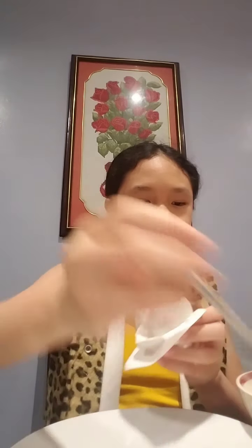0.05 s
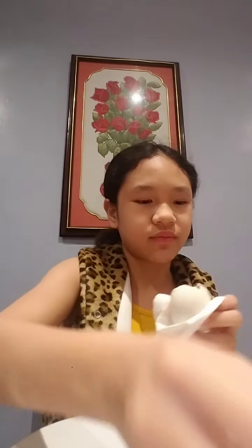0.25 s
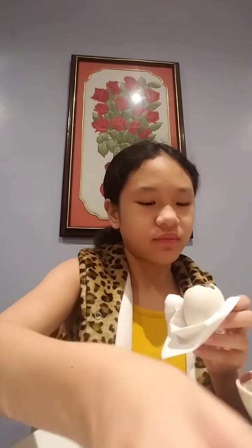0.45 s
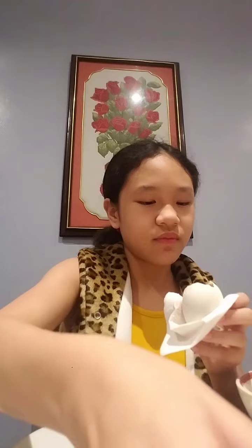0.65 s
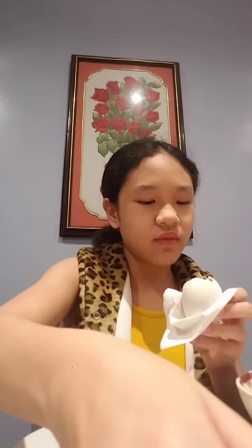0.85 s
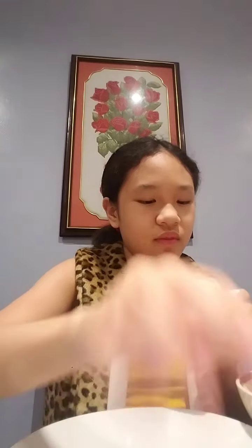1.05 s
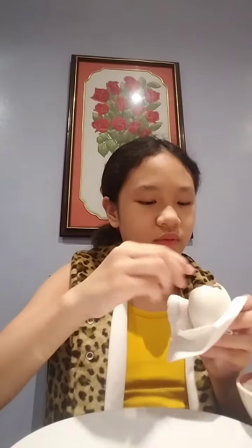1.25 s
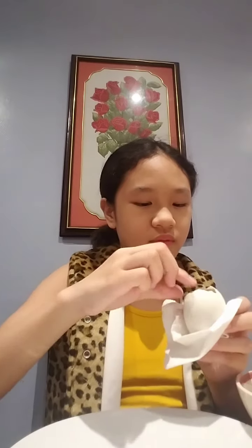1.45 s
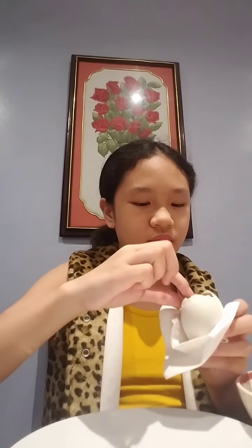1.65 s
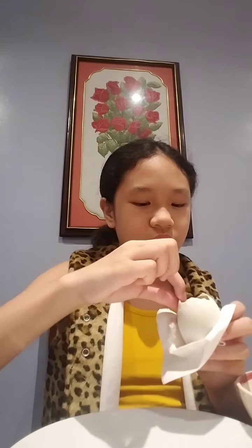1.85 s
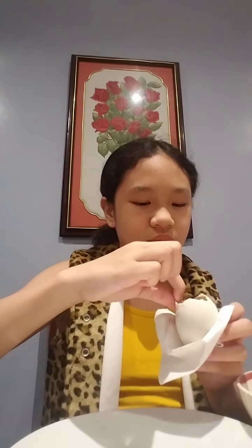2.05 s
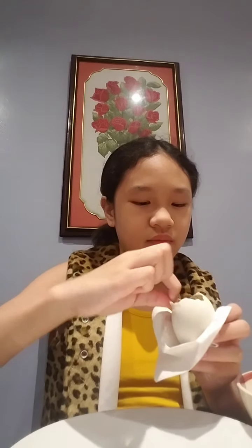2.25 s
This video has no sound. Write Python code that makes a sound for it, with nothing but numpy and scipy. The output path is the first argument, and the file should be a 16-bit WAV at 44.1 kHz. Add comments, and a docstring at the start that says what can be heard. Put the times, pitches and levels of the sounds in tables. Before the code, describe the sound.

Close by in a small, faintly humming room, a metal utensil lands on a table with bright ringing clinks and a brief chatter. After a pause, an eggshell crackles faintly under fingers while a paper napkin rustles softly.

```python
"""In a small, faintly humming room, a steel utensil is put down on a table close to the microphone.
One end clinks, then the other drops, chatters and settles: each touch makes the steel ring, and the
heavier ones make the table knock. Fingers then pick at an eggshell, which snaps in tiny dry cracks,
while hands bump softly and a paper napkin rustles."""
import sys
import numpy as np
from scipy import signal
from scipy.fft import rfft, irfft
from scipy.io import wavfile

SR = 44100
rng = np.random.default_rng(int(sys.argv[2]) if len(sys.argv) > 2 else 0)


def master_out(mix):
    """Clip the mix to full scale and print it as 16-bit PCM to the path in sys.argv[1]."""
    frames = np.transpose(np.atleast_2d(mix))
    ceiling = np.clip(frames, -1, 1)
    pcm = np.round(ceiling * 32767).astype(np.int16)
    wavfile.write(sys.argv[1], SR, pcm)


N = 105840
TIME, FREQS = np.arange(N) / SR, np.arange(N // 2 + 1) * SR / N

# tone colour of the room's air and of the napkin: f/Hz, relative level/dB
AIR_COLOUR = [(25, -9), (55, -0.5), (145, -7), (245, -6.5), (300, -11), (480, -16.5), (750, -18.5),
              (1200, -25.5), (2400, -27.5), (4600, -35.5), (8500, -39.5), (14800, -31.5), (16000, -41)]
NAPKIN_COLOUR = [(50, -7), (130, 1.5), (320, 0.5), (700, -10), (1500, -12.5), (5500, -18), (9000, -23.5)]
# how alike left and right are, for room and table sounds: f/Hz, likeness (1 = the same)
AIR_LIKENESS = [(60, 0.97), (300, .85), (1000, 0.14), (3000, 0.05), (15000, 0.031)]
TABLE_LIKENESS = [(100, 0.63), (500, 1), (2200, .8), (4500, 0.21), (15000, 0.72)]
# mains hum: f/Hz, level/dB
HUM = [(120, -79), (240, -72.5), (479, -78)]
# how a far tone, the napkin and the shell crumbs swell and fade: t/s, level/dB
TONE_LEVEL = [(1.58, -96), (1.61, -71), (1.66, -83.5), (1.71, -70), (1.77, -80.5), (2.0, -87)]
NAPKIN_LEVEL = [(1.59, -86.5), (1.635, -59.5), (1.75, -67), (2.28, -67.5), (2.305, -50.5), (2.365, -57.5),
                (2.4, -63)]
CRUMB_LEVEL = [(1.57, -87), (1.61, -48.5), (1.72, -85), (1.8, -57), (1.92, -53.5), (2.06, -74), (2.2, -48),
               (2.4, -63)]
# soft bumps and rubs of the hands: t/s, level/dB, strongest f/Hz
BUMPS = [(1.079, -64.5, 2564), (1.134, -71, 3990), (1.202, -58.5, 1306), (1.555, -56.5, 909),
         (1.636, -58.5, 750), (1.69, -61, 752)]
# cracks in the shell: t/s, level/dB, extra for low notes/dB, extra for high notes/dB
CRACKS = [(0.752, -76, -15, 18), (.765, -70, -17, 23), (1.607, -47, -7, 16), (1.6332, -42, -21, 6),
          (1.6986, -51.5, 1, -1), (1.7582, -47, -10, 5), (1.7876, -44.5, -15, 16),
          (1.792, -26.5, -0.5, 6.5), (1.799, -47, -2, 18.5), (1.8065, -49, 14, -3), (1.851, -39, -10, 17),
          (1.882, -44.5, 1, -2), (1.9015, -47, -6, 4), (1.9493, -40.5, 6.5, 3), (1.966, -40.5, -6, 0),
          (2.0277, -43.5, -0.5, 4.5), (2.0617, -48.5, -5, 8), (2.0951, -49.5, 8, 10), (2.185, -43, -8, 6),
          (2.1997, -31, -3, -8), (2.2154, -35, 6.5, -1), (2.2948, -30, 1.5, 0), (2.308, -40.5, 3.5, -11),
          (2.351, -48, -3, 20), (2.358, -46, -1, 3), (2.397, -28.5, 1, 0)]
# the shell's modes (notes it rings at): f/Hz, level/dB, t60/s (time to fade by 60 dB)
SHELL_MODES = [(2270, -12.5, 0.0037), (2980, -7.5, .005), (4340, -3.5, 0.0033), (5210, -3, .0025),
               (6250, -1.5, .0035), (8300, -16.5, .0015), (9900, -14, 0.0016), (11900, -15.5, .0015),
               (14799, -14.5, .0025)]
# knocks on the table top: t/s, knock level/dB, boom level/dB
KNOCKS = [(0.202, -18.5, -29.5), (.215, -24.5, -41.5), (0.253, -29, -40), (.456, -42, -33),
          (0.4651, -33.5, -26), (0.473, -34.5, -36.5), (0.5685, -43.5, -43), (0.584, -49, -40.5)]
# tone colour of a knock: f/Hz, relative level/dB
KNOCK_COLOUR = [(40, -22.5), (85, -10.5), (125, 6), (190, 6.5), (260, 4), (350, 9), (450, -29), (1500, -44)]
# which side table sounds lean to: f/Hz, left minus right/dB
TABLE_PAN = [(60, 1), (200, -6), (700, -7), (2400, -3), (4400, -8), (7800, 0), (9600, -17.5), (11500, -4.5),
             (15000, -3.5)]
# the first end lands, the other drops, the utensil settles: t/s, level/dB, treble tilt/(dB per octave)
FIRST_TOUCHES = [(.2004, -6, 2), (.2022, 0, 3.5), (.2128, -1.5, -7), (.2158, 4.5, -0.5), (.2235, -1, 4.5),
                 (.2355, -4.5, 2), (.247, -10.5, 2), (.2605, -17, -5.5)]
DROP_TOUCHES = [(.4555, -3.5, -6), (.461, 2, 3.5), (.464, 9, 1), (.472, 2.5, 5.5), (.476, 0.5, 0),
                (.4825, 0.5, 5.5), (.4875, -11, -9), (.5025, -18, 1.5)]
SETTLE_TOUCHES = [(.5672, 8, -3), (.572, 5, 5), (.583, 6.5, -1), (.599, 0, -4.5), (.6065, -4, -6),
                  (.614, -16.5, -5), (.629, -26, -9)]
# the steel's modes in those three stages: f/Hz, level/dB, t60/s
FIRST_MODES = [(2331, -35, .26), (3115, -32, .2), (3135, -34, .23), (3290, -39, .22), (3376, -38, .2),
               (4190, -23.5, .18), (5157, -32, .22), (5212, -37, .33), (5406, -32, .16), (5480, -35, .17),
               (6212, -38, .23), (6810, -34.5, .2), (7518, -39, .21), (8037, -44, .24), (9577, -25, .19),
               (9837, -35, .17), (9922, -34, .16), (11594, -41, .15), (11800, -41, .28), (11985, -43, .34),
               (12510, -49, .38), (12830, -48, .2), (13410, -42, .17), (15149, -39, .16), (15380, -36, .1)]
DROP_MODES = [(2004, -32.5, .13), (3142, -38, .18), (4190, -38, .13), (4393, -36, .12), (4510, -34, .12),
              (6700, -35, .06), (7745, -36, .11), (7797, -36, .12), (9792, -49, .16), (11789, -46, .14),
              (12010, -49, .2), (13370, -52, .14)]
SETTLE_MODES = [(1653, -50, .16), (2005, -51, .27), (2095, -44, .16), (2983, -50, .13), (4096, -50, .13),
                (4510, -50, .2), (4703, -47, .13), (4775, -50, .11), (7970, -53, .15), (12010, -68, .25)]
# tone colour of the clatter, the dense ring of utensil and table together: f/Hz, relative level/dB
FIRST_CLATTER = [(450, -20.5), (800, -9), (1150, -15.5), (1550, -3), (2400, 5), (2950, -13), (3250, -2.5),
                 (3750, -10.5), (4300, -0.5), (4750, -5.5), (5400, 9.5), (5900, -5.5), (6800, 1),
                 (7500, -14.5), (8100, -4.5), (8700, -13.5), (9700, -4), (10600, -19), (11300, -4),
                 (12400, -17.5), (13300, -9.5), (14100, -23.5), (15200, -5.5), (16000, -32.5)]
DROP_CLATTER = [(450, -4), (1000, -4), (1600, 1.5), (2000, 15), (2600, 2), (3200, 3.5), (3700, -4),
                (4450, 12), (5300, -3.5), (6100, -7.5), (6650, 1.5), (7300, -14), (7850, 8), (8800, -7),
                (9700, -5), (10400, -18), (11800, -4.5), (12900, -21.5), (15100, -10), (16000, -36)]
SETTLE_CLATTER = [(450, 2), (800, -34), (1550, 8.5), (2100, 9), (2400, -4), (3000, 9.5), (3700, -14.5),
                  (4200, 4), (4800, 11.5), (6300, -18), (8000, 0.5), (10600, -18), (12000, -17),
                  (16000, -22)]
# how long the clatter takes to fade: f/Hz, t60/s
FIRST_T60 = [(500, 0.23), (2500, 0.15), (15000, .12)]
DROP_T60 = [(500, 0.041), (2500, 0.1), (15000, 0.054)]
SETTLE_T60 = [(500, 0.08), (2500, 0.06), (15000, 0.045)]


def from_db(db):
    """Turn decibels into a factor to multiply by."""
    return 10 ** (np.asarray(db) / 20)


def at_hz(points, hz):
    """Read between the rows of a table, on a scale of octaves."""
    f, value = np.transpose(points)
    return np.interp(np.log(np.maximum(hz, 1)), np.log(f), value)


def level(points):
    """Gain over time from rows of t/s, level/dB."""
    return from_db(np.interp(TIME, *np.transpose(points)))


def panned(db):
    """Left and right gains, with the left louder by db."""
    return from_db(db * np.array([[.5], [-.5]]))


def clicks(times, sizes):
    """One-sample clicks of the given sizes at the given times."""
    return np.bincount((np.abs(times) * SR).astype(int), sizes, N)[:N]


def fading(times, db, t60):
    """Strength of a vibration that gains energy at each touch and loses it steadily."""
    energy_kept = from_db(-60 / (t60 * SR)) ** 2
    return np.sqrt(signal.lfilter([1], [1, -energy_kept], clicks(times, from_db(db) ** 2) + 1e-18))


def eased(envelope, rise_s=.0003):
    """Give each touch a brief moment to build up."""
    kept = np.exp(-1 / (rise_s * SR))
    return signal.lfilter([1 - kept], [1, -kept], envelope)


def noise(colour, likeness):
    """Stereo noise of a given tone colour and left-right likeness, with average power 1."""
    mid, side = rfft(rng.standard_normal((2, N)))
    alike = np.clip(at_hz(likeness, FREQS), -1, 1)
    stereo = np.sqrt(1 + alike) * mid + np.sqrt(1 - alike) * side * [[1], [-1]]
    x = irfft(from_db(at_hz(colour, FREQS)) * stereo, N)
    return x / x.std()


def background(air_db=-59.5, tone_hz=1340):
    """Room air, mains hum and a faint far tone that comes and goes."""
    sine = lambda hz: np.sqrt(2) * np.sin(2 * np.pi * (hz * TIME + rng.random()))
    hum = sum(from_db(db) * sine(hz) for hz, db in HUM)
    return from_db(air_db) * noise(AIR_COLOUR, AIR_LIKENESS) + hum + level(TONE_LEVEL) * sine(tone_hz)


def napkin_and_hands():
    """The napkin rustles in swells of noise; each bump of the hands is a short, soft puff."""
    out = level(NAPKIN_LEVEL) * noise(NAPKIN_COLOUR, AIR_LIKENESS)
    for start, db, hz in BUMPS:
        rub = noise([(hz / 4, -35), (hz, 0), (hz * 3, -35)], AIR_LIKENESS)
        out += fading(np.array([start]), [db], t60=.108) * rub
    return out


def room_echo(x, t60=.22, delay_s=.008):
    """Sound bounces around the room and returns as a blur, different left and right."""
    t = TIME[:SR // 2]
    echoes = rng.standard_normal((2, len(t))) * from_db(-60 * t / t60) * (t > delay_s)
    echoes /= np.sqrt(np.sum(echoes ** 2) / 2)
    return signal.fftconvolve(x[None], echoes, axes=1)[:, :N]


def eggshell(crumbs_per_s=120, scatter_db=1.5):
    """Cracks and crumbs make the shell ring for a few milliseconds, straight ahead."""
    times, db, low_db, high_db = np.transpose(CRACKS)
    crumbs = (rng.random(N) < crumbs_per_s / SR) * rng.choice([-1, 1], N) * level(CRUMB_LEVEL)
    scatter = scatter_db * rng.standard_normal((len(times), len(SHELL_MODES)))
    splinters = from_db(-15) * rng.standard_normal(N)   # tiny fractures that follow each snap
    out = np.zeros(N)
    for k, (hz, mode_db, t60) in enumerate(SHELL_MODES):
        snap_db = db + scatter[:, k] + low_db * (hz < 3600) + high_db * (hz > 7000)
        snaps = clicks(times, from_db(snap_db)) + fading(times, snap_db, t60=.0074) * splinters + crumbs
        kept, turn = from_db(-60 / (t60 * SR)), 2 * np.pi * hz / SR   # fade and angle per sample
        ring = signal.lfilter([.5, 0, -.5], [1, -2 * kept * np.cos(turn), kept * kept], snaps + 1e-18)
        out += (-1) ** k * from_db(mode_db) * ring
    return out + from_db(-10) * room_echo(out)


def from_table(hz, lag_s=.000286):
    """Place a sound on the table: it reaches the left side later and mostly weaker."""
    gains = panned(at_hz(TABLE_PAN, hz))
    delay = np.exp(-2j * np.pi * hz * lag_s * np.array([[1], [0]]))
    return gains / np.sqrt(np.mean(gains ** 2, axis=0)) * delay


def table_top(boom_hz=193.5, low_cut_hz=96):
    """The table answers the heavier touches with a dull knock and a short boom of its main mode."""
    times, knock_db, boom_db = np.transpose(KNOCKS)
    envelope = np.hypot(fading(times, knock_db, t60=.054), fading(times, knock_db - 19.5, t60=.46))
    knock = envelope * irfft(rfft(noise(KNOCK_COLOUR, TABLE_LIKENESS)) * from_table(FREQS), N)
    wave = from_table(boom_hz) * np.exp(2j * np.pi * (boom_hz * TIME + rng.random()))
    boom = fading(times, boom_db, t60=.043) * wave.real
    return signal.sosfilt(signal.butter(2, low_cut_hz, "high", fs=SR, output="sos"), knock + boom)


def ripple(depth_db=1.5, width_hz=70):
    """Crowded weak modes put random peaks and dips in the clatter's tone colour."""
    heights = rng.standard_normal(len(FREQS)).clip(-2, 2)
    gain = from_db(depth_db * np.interp(FREQS / width_hz, np.arange(len(FREQS)), heights))
    return gain / np.sqrt(np.mean(gain ** 2))


def touches_at(touches, hz):
    """When the touches come, and how hard each one drives this frequency, in dB."""
    times, db, tilt = np.transpose(touches)
    return times, db + tilt * np.log2(max(hz, 1500) / 4000)


def clatter(touches, colour, t60s, gain_db):
    """Each touch gives a sharp tick, a dense ring of utensil and table, and an echo from the room."""
    dense = rfft(noise(colour, TABLE_LIKENESS)) * from_table(FREQS) * ripple()
    edges_hz = np.geomspace(420, 17000, 9)
    out = np.zeros((2, N))
    for low, high in zip(edges_hz, edges_hz[1:]):
        hz = np.sqrt(low * high)
        times, band_db = touches_at(touches, hz)
        tick = fading(times, band_db + gain_db + 3, t60=.017)
        ring = fading(times, band_db + gain_db, at_hz(t60s, hz))
        band = irfft(dense * ((FREQS >= low) & (FREQS < high)), N)
        out += eased(np.hypot(tick, ring)) * band
    # the echo is strong where the clatter is, with slightly gentler peaks
    echo = noise([(hz, .85 * db) for hz, db in colour], AIR_LIKENESS)
    times, touch_db, _ = np.transpose(touches)
    return out + eased(fading(times, touch_db + gain_db - 22.5, t60=.31)) * echo


def steel_ring(touches, modes, gain_db, spread_hz=36, neighbour_db=-13):
    """Touches set the steel's clear notes ringing; four weak neighbours broaden each note."""
    out = np.zeros((2, N))
    t = TIME[:SR]
    for hz, mode_db, t60 in modes:
        offsets_hz = spread_hz * rng.uniform(-1, 1, size=4)
        phases = np.exp(2j * np.pi * rng.random((2, 4)))
        neighbours = from_db(neighbour_db) * phases @ np.exp(2j * np.pi * np.outer(offsets_hz, t))
        wave = from_table(hz) * np.exp(2j * np.pi * (hz * t + rng.random())) * (1 + neighbours)
        times, touch_db = touches_at(touches, hz)
        envelope = eased(fading(times, touch_db + gain_db + mode_db, t60))
        out[:, :SR] += envelope[:SR] * wave.real
    return out


def utensil():
    """One end lands, the other drops and bounces, then the utensil rocks to rest."""
    first = steel_ring(FIRST_TOUCHES, FIRST_MODES, gain_db=-.22)
    first += clatter(FIRST_TOUCHES, FIRST_CLATTER, FIRST_T60, gain_db=-19.5)
    drop = steel_ring(DROP_TOUCHES, DROP_MODES, gain_db=-6)
    drop += clatter(DROP_TOUCHES, DROP_CLATTER, DROP_T60, gain_db=-24)
    settle = steel_ring(SETTLE_TOUCHES, SETTLE_MODES, gain_db=-7.5)
    settle += clatter(SETTLE_TOUCHES, SETTLE_CLATTER, SETTLE_T60, gain_db=-41.5)
    return first + drop + settle * panned(db=-4)


def scene():
    """Utensil, table, room, hands and eggshell together."""
    return utensil() + table_top() + background() * panned(db=-2) + napkin_and_hands() + eggshell()


def record(dry):
    """Cut the deep bass, round off the tallest peaks and cut the highest treble."""
    bass_cut = signal.butter(4, 35, "high", fs=SR, output="sos")
    treble_cut = signal.ellip(10, .2, 80, 15750, fs=SR, output="sos")
    return signal.sosfilt(treble_cut, np.tanh(signal.sosfilt(bass_cut, dry)))


dry = scene()
out = record(dry)
master_out(out)
```